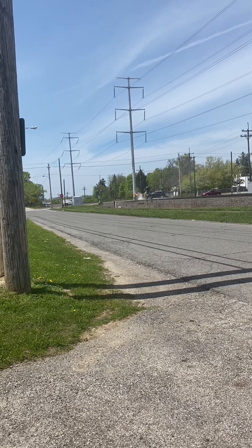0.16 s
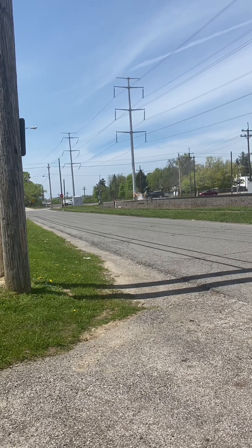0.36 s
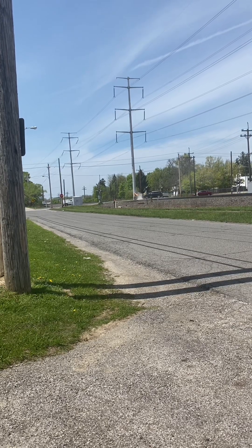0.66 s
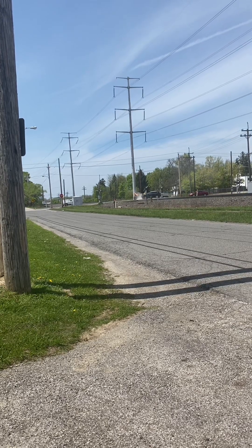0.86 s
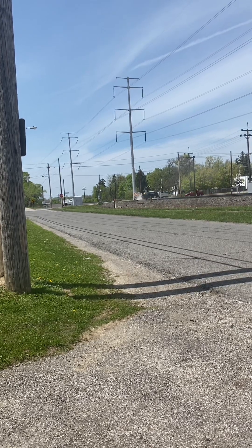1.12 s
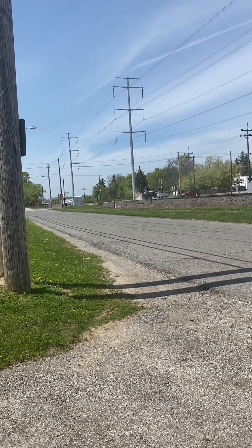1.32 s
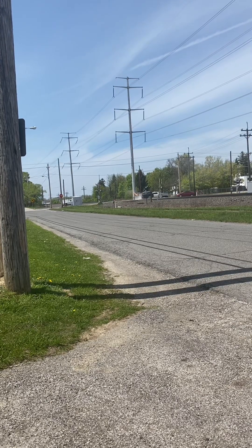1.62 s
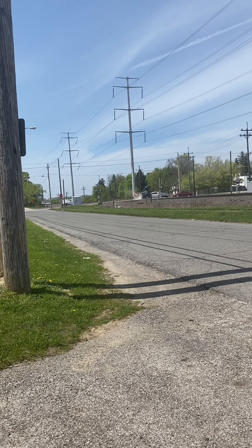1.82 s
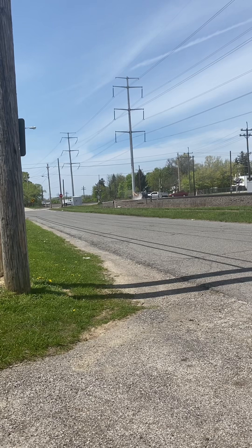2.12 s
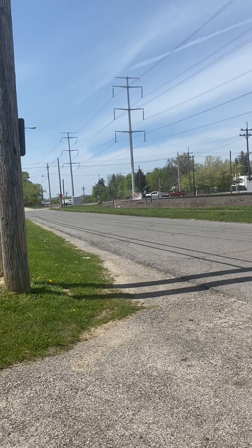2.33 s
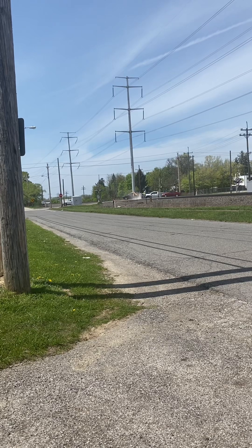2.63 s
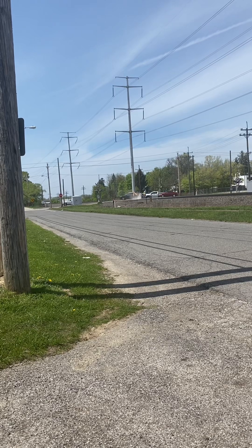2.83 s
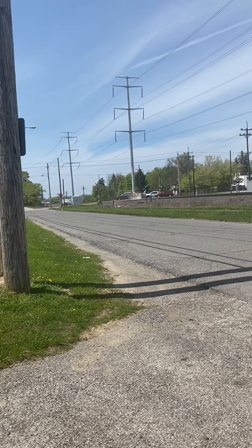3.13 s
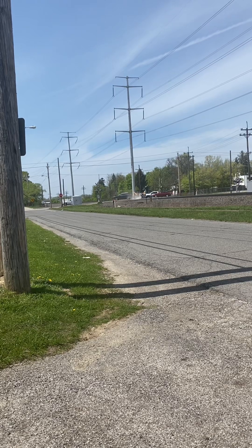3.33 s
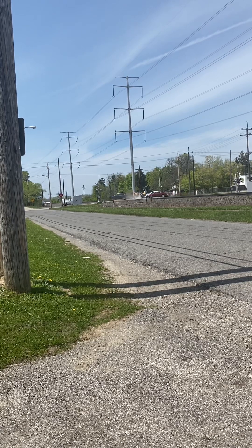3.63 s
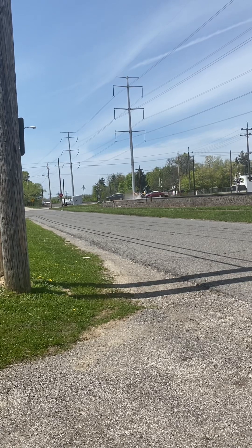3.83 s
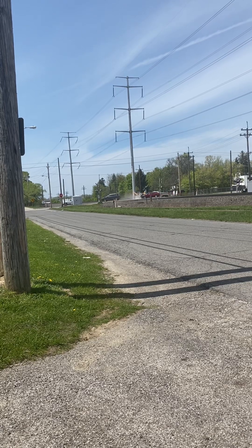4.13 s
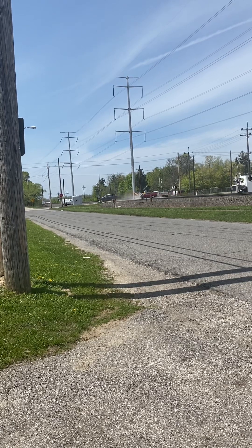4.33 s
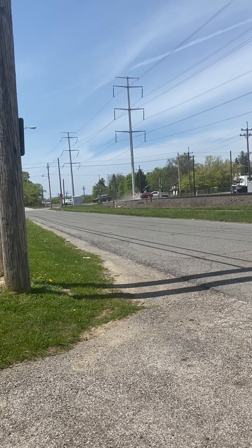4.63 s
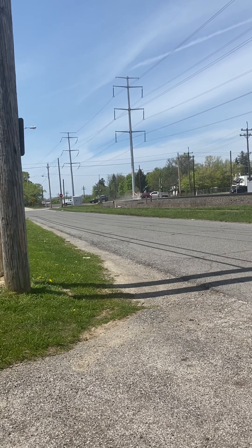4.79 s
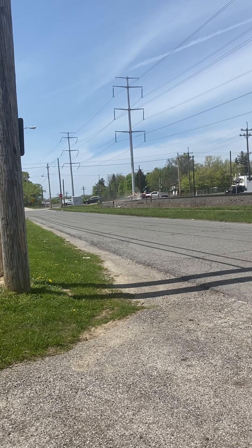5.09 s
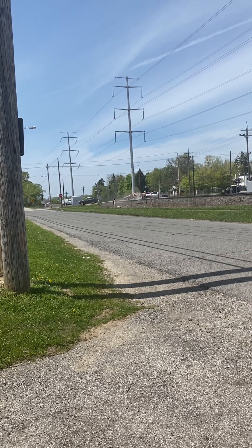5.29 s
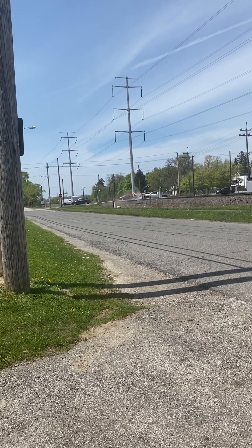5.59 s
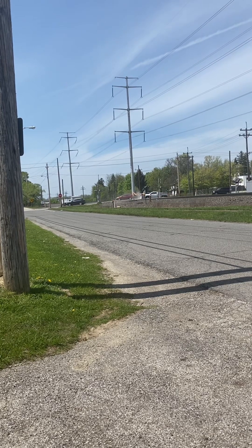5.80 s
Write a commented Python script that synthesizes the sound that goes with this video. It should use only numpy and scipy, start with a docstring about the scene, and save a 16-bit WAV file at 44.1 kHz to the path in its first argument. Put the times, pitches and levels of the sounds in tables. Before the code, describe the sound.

Gusty wind thumps the microphone while a rail maintenance machine clatters through stones and drones, stops for a second and starts again.

```python
"""Ballast machine at a rail crossing

Tools churn the track stones and shake a steel frame, stop for a second, then bite again.
The frame rings and drones, an engine growls and idles on, and wind buffets a phone's two
microphone openings (ports). Sounds are built as the sum and the difference of the two ports."""
import sys
import numpy as np
from scipy import signal
from scipy.fft import rfft, irfft, next_fast_len
from scipy.io import wavfile
from scipy.ndimage import uniform_filter1d

SR = 44100
rng = np.random.default_rng(int(sys.argv[2]) if len(sys.argv) > 2 else 0)


def master(y):
    """Save y as 16-bit WAV."""
    cut = np.clip(np.atleast_2d(y).T, -1, 1)
    pcm = np.round(cut * 32767)  # scale
    wavfile.write(sys.argv[1], SR, pcm.astype(np.int16))


N = 262395
FFT_SIZE = next_fast_len(N)
HZ = np.maximum(np.arange(FFT_SIZE // 2 + 1) * SR / FFT_SIZE, 1)
SECONDS = np.arange(N) / SR

# Tone colour of the distant engine and road. Each row: frequency in Hz, relative level in dB.
DISTANT_COLOUR = [(200, -19), (300, -16), (440, -5.5), (510, 5), (600, 0), (1000, -1), (2400, -6.5),
                  (2900, -12.5), (4500, -22.5), (6000, -14.5), (6400, -53), (9000, -63)]
# Two idling tones. Each row: time in seconds, lower pitch in Hz, lower level in dB, upper level in dB.
IDLE_TONES = [(3.5, 245, -41.5, -75), (3.75, 228, -37.5, -67), (4.0, 204.4, -42, -65),
              (4.2, 190.4, -40, -70), (4.33, 184.2, -40, -55), (4.45, 180.8, -39, -64),
              (4.6, 179.7, -42.5, -60.5), (4.78, 181.6, -43.5, -53), (4.95, 178.2, -44, -54.5),
              (5.1, 175.2, -63, -78)]
# Steady wind. Each row: time in seconds, then three levels in dB: the deep and the upper part
# that press both ports alike, and the part that presses them in opposite ways.
STEADY_WIND = [(0, -33.5, -37.5, -40.5), (.4, -32.5, -32.5, -42), (.8, -30.5, -34.5, -34.5),
               (1.2, -29.5, -36.5, -28), (1.6, -41.5, -39.5, -33), (1.9, -42, -42, -35),
               (2.2, -40.5, -46.5, -35.5), (2.5, -39, -42.5, -34), (2.75, -50, -39.5, -38),
               (3.1, -38, -37, -32.5), (3.4, -38, -33, -36.5), (3.9, -43.5, -29, -35.5),
               (4.2, -41.5, -40.5, -35.5), (4.4, -37.5, -49, -35), (4.9, -31.5, -45.5, -39),
               (5.3, -37.5, -36.5, -34.5), (5.6, -30.5, -36.5, -38.5), (5.95, -36, -29, -30)]
# The opposite wind. Each row: time in seconds, dB of its upper part relative to its deep part.
OPPOSITE_WIND_TILT = [(0, -3.5), (1, -13), (2.4, -3), (3.3, -12), (4.3, -16), (5.1, -12.5), (5.95, -12)]
# Gusts. Each row: middle in seconds, level change in dB, half length in seconds.
WIND_GUSTS = [(0.548, 3.5, 0.035), (.93, 8, .03), (.99, 9, 0.04), (1.06, 7, 0.038), (1.3, 12, 0.018),
              (1.42, 1, 0.024), (1.54, 11, 0.017), (1.65, 11, 0.043), (1.8, 8.5, 0.024), (2.0, 7, 0.037),
              (2.16, 6, 0.023), (2.36, 7.5, 0.035), (2.63, 0.5, 0.027), (3.24, 3.5, 0.048),
              (3.46, -3, 0.027), (4.33, 7, 0.034), (4.47, 5, 0.022), (4.6, 3.5, 0.017), (4.79, 1, 0.029),
              (5.2, 8.5, 0.052), (5.58, 5, 0.053)]
# Single thumps of wind. Each row: middle in seconds, strength in dB, pitch in Hz.
WIND_KNOCKS = [(0.163, -23, 150), (.531, -15, 150), (0.944, -20, 120), (.959, -13, 130), (1.013, -15, 169),
               (1.021, -14.5, 170), (1.052, -15, 169), (1.068, -14, 170), (1.092, -17, 100),
               (1.13, -11, 124.6), (1.303, -15, 129), (1.351, -15.5, 130), (1.524, -22, 218),
               (1.533, -16.5, 238), (1.543, -18.5, 109), (1.633, -15, 250), (1.685, -18.5, 260),
               (2.277, -18, 219), (2.304, -15, 260), (2.337, -21, 260), (2.353, -11, 219),
               (2.3609, -13.5, 510), (2.365, -16, 300), (3.459, -12, 159.7), (4.33, -34, 300),
               (4.475, -33, 310), (4.648, -33, 300), (5.19, -18.5, 110.7)]
# Brief drops of the bass. Each row: start in seconds, length in seconds, depth in dB.
BASS_DIPS = [(0.418, 0.12, -3), (1.094, 0.084, -4), (2.38, 0.11, -6.5), (2.486, 0.042, -10),
             (3.974, 0.031, -3.5), (4.441, 0.022, -16), (4.983, 0.05, -5.5), (5.41, 0.086, -1)]
# The engine's growl. Each row: time in seconds, pitch in Hz, level in dB.
ENGINE_NOTE = [(0, 135, -37.5), (.12, 134, -30), (.6, 131, -35), (1.0, 128, -28.5), (1.3, 129, -39.5),
               (1.9, 134, -45), (2.15, 136, -44), (2.25, 137, -29.5), (2.33, 137, -29), (2.45, 138, -33.5),
               (2.53, 138, -49), (2.75, 139, -46), (2.9, 140, -34), (3.1, 143, -30.5), (3.3, 135, -33),
               (3.6, 138, -34), (4.0, 124, -39.5), (4.6, 128, -48), (5.1, 131, -44), (5.2, 132, -32),
               (5.6, 121, -33), (5.85, 131, -29), (5.95, 135, -31.5)]
# The drone follows how hard the frame is shaken.
# Each row: middle in seconds, level change in dB, half length in seconds.
DRONE_SWELLS = [(.17, 9, 0.027), (.62, 5, 0.053), (.76, 3.5, 0.036), (.86, 5, 0.025), (1.05, 4, 0.026),
                (1.43, 5.5, 0.029), (1.8, 0.5, 0.023), (2.03, 6.5, 0.051), (2.3, 4, 0.059),
                (2.44, -6, 0.05), (2.55, 6, 0.053), (2.63, 3.5, .03), (2.71, 7, 0.024), (2.92, 1.5, 0.098),
                (3.24, 6.5, 0.091), (3.45, 5, 0.13), (3.66, 8, 0.028), (5.17, 5, 0.025), (5.29, 8, 0.05),
                (5.52, 5.5, 0.047), (5.76, 7.5, 0.083)]
# Grit close by. Each row: start in seconds, strength in dB.
GRIT_TICKS = [(2.633, -50), (4.4676, -62), (4.7194, -60)]
# Hard hits on the frame. Each row: middle in seconds, level in dB, pitch in Hz, half length in seconds.
FRAME_PINGS = [(.32, -48, 3100, 0.013), (.378, -35.5, 1270, 0.012), (.382, -36, 2340, .008),
               (2.634, -39, 4400, 0.003), (2.825, -32, 1280, 0.013), (2.896, -29, 2376, 0.0075),
               (2.97, -34.5, 2290, 0.014), (3.12, -30, 1230, 0.014), (3.16, -34, 2335, 0.01),
               (3.45, -33.5, 1060, 0.027), (3.871, -36.5, 626, 0.031), (5.29, -29, 2353, 0.017),
               (5.33, -50, 4400, 0.014), (5.432, -27, 1050, 0.011), (5.515, -43, 3160, 0.014),
               (5.61, -46.5, 4450, 0.014), (5.68, -45, 3150, 0.016), (5.441, -33.5, 2290, 0.024),
               (5.77, -33, 964, 0.017)]
# Stones hitting steel. Each row: start in seconds, strength in dB.
STONE_CLANKS = [(0.38, -47), (0.5178, -46), (0.6434, -52), (1.037, -45.5), (1.201, -44.5), (1.3874, -44.5),
                (2.378, -35), (2.63, -48), (2.813, -44.5), (2.9775, -47), (3.058, -37.5), (3.1388, -39),
                (3.2952, -41), (3.388, -32.5), (3.477, -41), (5.4833, -44), (5.5418, -70), (5.5878, -54),
                (5.668, -42)]
# How hard the tools work. Each row: time in seconds, then levels in dB of the clatter,
# the steel's ring, the mids and the low mids.
TOOL_EFFORT = [(0, -39, -50, -39, -41.5), (.21, -39, -51, -39, -40), (.3, -45, -54, -45, -41.5),
               (.38, -36.5, -48, -38, -39), (.48, -38.5, -52, -38.5, -39), (.62, -39, -51.5, -43.5, -41.5),
               (.75, -41, -51, -42.5, -38.5), (.9, -42.5, -52, -44, -42), (1.15, -45, -53, -42.5, -43.5),
               (1.36, -44, -52.5, -42, -41.5), (1.6, -43, -53.5, -42.5, -42),
               (1.9, -44, -54.5, -46.5, -41.5), (2.17, -45.5, -54, -45, -42), (2.36, -46, -54.5, -42, -37),
               (2.55, -44, -54, -42.5, -40), (2.75, -39, -51, -40, -37.5), (3.0, -37, -50.5, -39, -38.5),
               (3.2, -35.5, -49, -38.5, -37), (3.35, -36, -52.5, -37, -38.5), (3.47, -35.5, -49, -36, -38),
               (3.6, -34.5, -49.5, -39, -37), (3.79, -44.5, -55, -48.5, -44.5),
               (3.89, -40.5, -54, -43, -39.5), (3.97, -46.5, -58, -47.5, -45),
               (4.12, -61.5, -64, -59.5, -52), (5.04, -56.5, -65, -58, -60.5),
               (5.13, -44.5, -55, -46, -47.5), (5.24, -36, -46, -40, -38.5), (5.45, -36, -48, -42.5, -38.5),
               (5.63, -41.5, -48.5, -44, -38.5), (5.78, -37, -47.5, -37.5, -38),
               (5.95, -37.5, -48, -41.5, -36.5)]
# Slices of the churning sound, each with its own level. Each row: low edge in Hz, high edge in Hz.
CHURN_BANDS = [(300, 560), (560, 850), (850, 1500), (1500, 2750), (2750, 5000), (5000, 7400), (7400, 16000)]
# The notes the steel frame rings at. Each row: pitch in Hz, width in Hz, dB over the broad clatter.
FRAME_NOTES = [(417, 15, 3.5), (452.2, 32.6, 10.5), (640.2, 22.7, 13.5), (954.4, 41, 10.5), (1075, 60, 7.5),
               (1288.5, 36, 7), (1710, 17, 6), (1858, 44, 7.5), (2095, 32, 10), (2284, 70, 7.5),
               (2404, 63, 6.5), (2645, 34, 4.5), (3140, 90, 7.5), (3300, 120, 4), (3490, 45, 5.5),
               (3616, 40, 6.5), (3890, 51, 4.5), (4007, 38, 4.5), (4277, 55, 5.5), (4460, 50, 5.5),
               (4730, 63, 6.5), (5800, 28, 5)]
# The machine's tone colour in the ports' sum and in their difference.
# Each row: frequency in Hz, relative level in dB.
SUM_COLOUR = [(330, -26.5), (400, -0.5), (545, -3), (800, -2.5), (1600, -1.5), (2450, -1.5), (2720, -9.5),
              (2960, -18), (3080, -17), (4300, -15.5), (6000, -27), (6700, -35.5), (7400, -62.5),
              (8600, -40), (11500, -46), (12500, -63.5)]
DIFFERENCE_COLOUR = [(330, -44), (800, -37.5), (1400, -54.5), (2200, -11), (3200, -19), (4800, -20.5),
                     (5400, -32.5), (6000, -28.5), (7500, -29.5), (9300, -55.5), (10500, -65.5),
                     (12200, -57.5), (14000, -60.5)]
# How far the difference is out of step with the sum. Each row: frequency in Hz, angle in radians.
DIFFERENCE_PHASE = [(1500, .5), (2500, .6), (3800, 2.73), (6000, 1.22), (12000, 1.6)]


def undb(db):
    """Turn decibels into a number to multiply by."""
    return 10 ** (np.asarray(db) / 20)


def unit(x):
    """Scale a signal to an average power of 1."""
    return x / np.sqrt(np.mean(x ** 2))


def curves(table):
    """Join a time table's rows with straight lines, one curve for each value column."""
    times, *columns = np.transpose(table)
    return [np.interp(SECONDS, times, column) for column in columns]


def along(table):
    """Spread a frequency table over all frequencies."""
    hz, value = np.transpose(table)
    return np.interp(np.log(HZ), np.log(hz), value)


def bumps(table):
    """Add up smooth swells, in dB."""
    return sum(db * np.exp(-((SECONDS - middle) / half) ** 2) for middle, db, half in table)


def around(moment):
    """The samples within a tenth of a second of a moment."""
    return slice(max(int(moment * SR) - SR // 10, 0), int(moment * SR) + SR // 10)


def shape(x, gain):
    """Filter a signal with one gain for each frequency."""
    return irfft(rfft(x, FFT_SIZE) * gain, FFT_SIZE)[:N]


def band(low_hz, high_hz, order=3):
    """Gains that keep a range of frequencies; a higher order has steeper edges."""
    return 1 / np.sqrt((1 + (low_hz / HZ) ** (2 * order)) * (1 + (HZ / high_hz) ** (2 * order)))


def ring(hz, width_hz):
    """Gains of one ringing note, 1 at its centre."""
    return 1 / (1 + 1j * (HZ ** 2 - hz ** 2) / (HZ * width_hz))


def wander(per_second):
    """A smooth random curve that usually strays by about 1."""
    hold = int(SR / per_second)
    steps = np.repeat(rng.standard_normal(N // hold + 1), hold)
    smooth = uniform_filter1d(uniform_filter1d(steps, hold), hold)[:N]
    return smooth / np.std(smooth)


def noise():
    """White noise, an even hiss."""
    return rng.standard_normal(N)


def distant_idle(level_db=-51, upper_hz=404):
    """Far engine and road noise with two unsteady idling tones; returns sum and difference."""
    colour = undb(along(DISTANT_COLOUR))
    rush = undb(level_db + .5 * wander(4.2)) * unit(shape(noise(), colour))
    difference = undb(level_db - 23.5) * unit(shape(noise(), colour * band(1800, 9000)))
    lower_hz, lower_db, upper_db = curves(IDLE_TONES)
    lower = np.sin(2 * np.pi * np.cumsum(lower_hz + 4 * wander(30)) / SR)
    lower *= undb(lower_db + 3.5 * wander(20))
    upper = np.sin(2 * np.pi * np.cumsum(upper_hz + 3 * wander(22)) / SR)
    upper *= undb(upper_db + 2.2 * wander(12))
    return rush + np.sqrt(2) * (lower + upper), difference


def swirling_air(deep_db, upper_db, deep_hz, upper_hz, flap_db, flap_rate, upper_order):
    """Swirling air makes a deep and an upper rumble that puff separately and flap together."""
    deep = unit(shape(noise(), band(*deep_hz, order=4)) * undb(1.66 * wander(10)))
    upper = unit(shape(noise(), band(*upper_hz, order=upper_order)) * undb(1.85 * wander(10)))
    flap = unit(undb(flap_db * wander(flap_rate)))
    return flap * (undb(deep_db) * deep + undb(upper_db) * upper)


def wind():
    """Gusty wind presses the ports alike (the sum) and in opposite ways (the difference)."""
    deep_db, upper_db, opposite_db = curves(STEADY_WIND)
    tilt_db, = curves(OPPOSITE_WIND_TILT)
    gust_db = bumps(WIND_GUSTS)
    opposite_db += .28 * gust_db
    alike = swirling_air(deep_db + gust_db, upper_db + .93 * gust_db, deep_hz=(45, 96.6),
                         upper_hz=(127.5, 270), flap_db=.72, flap_rate=30, upper_order=6)
    opposite = swirling_air(opposite_db, opposite_db + tilt_db, deep_hz=(55, 260),
                            upper_hz=(300, 540), flap_db=2.96, flap_rate=35, upper_order=3)
    return alike, opposite


def wind_knocks():
    """Each thump of wind is a swing and a half of air pressure with a flattened peak."""
    out = np.zeros(N)
    for middle, db, hz in WIND_KNOCKS:
        near = around(middle)
        cycles = (SECONDS[near] - middle) * hz
        swing = np.cos(2 * np.pi * cycles) * np.exp(-(cycles / .5) ** 2)
        out[near] -= undb(db) * np.tanh(1.1 * swing)
    return out


def dip_bass(x):
    """Now and then the low end drops suddenly and creeps back."""
    depth_db = np.zeros(N)
    for start, length, db in BASS_DIPS:
        age = np.maximum(SECONDS - start, 0)
        depth_db += db * (SECONDS >= start) * np.exp(-(age / length) ** 4)
    gain = uniform_filter1d(undb(depth_db), size=SR // 200)
    return x + shape(x, band(1, 1150)) * (gain - 1)


def rough_tone(hz, throb_db, throb_rate, roughness, rough_rate):
    """A tone driven unevenly: it throbs in level and jitters in level and timing."""
    tone = np.exp(2j * np.pi * np.cumsum(hz) / SR)
    throb = unit(undb(throb_db * wander(throb_rate)))
    jitter = 1 + roughness * (wander(rough_rate) + 1j * wander(rough_rate))
    return unit((tone * throb * jitter).real)


def engine_growl():
    """The engine runs unevenly, so its low note wavers and sounds rough."""
    hz, level_db = curves(ENGINE_NOTE)
    note = rough_tone(hz + 7 * wander(16), throb_db=1.2, throb_rate=16, roughness=.75, rough_rate=60)
    return undb(level_db) * note


def tool_pause_db(lift_s=3.68, fade_db_per_s=47.5, floor_db=-27.5, bite_s=5.03, rise_s=.13):
    """The drone fades when the tools lift out and returns quickly when they bite again."""
    fade_db = np.clip(-fade_db_per_s * (SECONDS - lift_s), floor_db, 0)
    return fade_db * np.clip(1 - (SECONDS - bite_s) / rise_s, 0, 1)


def frame_drone(hz=345.3, base_db=-36.5):
    """The shaken frame hums at its lowest note, with a narrow rumble just below it."""
    level_db = base_db + tool_pause_db() + bumps(DRONE_SWELLS)
    hum = rough_tone(hz + 5 * wander(25), throb_db=1.5, throb_rate=24.88, roughness=.48, rough_rate=70)
    rumble = unit(shape(noise(), ring(321, 38) * band(290, 370)))
    return undb(level_db) * (hum + undb(-4.5) * rumble)


def grit_ticks(decay_s=.003):
    """Grit close by ticks in tiny bursts of bright noise."""
    bursts = sum(undb(db) * (SECONDS >= start) * np.exp(-np.maximum(SECONDS - start, 0) / decay_s)
                 for start, db in GRIT_TICKS)
    return shape(bursts * noise(), band(3500, 9000, order=1))


def frame_pings(roughness=.4):
    """A hard hit rings one note of the frame, roughened by the stone and softened by distance."""
    out = np.zeros(N)
    for middle, db, hz, half in FRAME_PINGS:
        near = around(middle)
        swell = np.exp(-((SECONDS[near] - middle) / half) ** 2)
        out[near] += undb(db) * swell * np.sin(2 * np.pi * hz * SECONDS[near])
    return out * unit(1 + roughness * wander(300))


def stone_hits(uneven_db=2):
    """Countless stone impacts of uneven size blur into a gritty hiss."""
    return unit(noise() * undb(uneven_db * rng.exponential(size=N)))


def clank_level(rise_s=.009, decay_s=.03):
    """Stones clank on steel and the level jumps; distance and echoes soften each start."""
    level = np.zeros(N)
    for start, db in STONE_CLANKS:
        age = np.maximum(SECONDS - start, 0)
        level += undb(db) * (1 - np.exp(-age / rise_s)) * np.exp(-age / decay_s)
    return level


def churn_levels(usual_clatter_db=-40):
    """Each band's level: the tools' effort, a shared surge, its own flicker and the clanks."""
    clatter_db, ring_db, mid_db, low_db = curves(TOOL_EFFORT)
    treble_db = -62 + .76 * (clatter_db - usual_clatter_db)  # the treble follows the clatter
    surge, clanks = wander(10), clank_level()
    levels_db = [low_db, low_db, mid_db, clatter_db, ring_db, treble_db, treble_db]
    flutter_depths = [2, 1.1, .44, .77, 1.36, 2.1, 2]
    clanks_db = [-29, -32, -6.5, -3.5, -13, -13, -9]  # clanks are brighter than the churn
    for level_db, depth, clank_db in zip(levels_db, flutter_depths, clanks_db):
        flutter_db = depth * .6 * (surge + wander(11))
        yield undb(level_db + flutter_db) + undb(clank_db) * clanks


def churning_stones(note_flutter_db=2.3):
    """Churned stones ring the frame, each note coming and going alone; returns sum and difference."""
    direct, scattered = stone_hits(), stone_hits()
    for hz, width_hz, db in FRAME_NOTES:
        shaking = stone_hits() * unit(undb(note_flutter_db * wander(20)))
        direct += undb(db) * shape(shaking, ring(hz, width_hz))
    sum_colour = undb(along(SUM_COLOUR))
    difference_colour = undb(along(DIFFERENCE_COLOUR)) * np.exp(1j * along(DIFFERENCE_PHASE))
    # Each band is divided by the strength of its range, so the tools' effort sets the loudness.
    ranges_hz = [(400, 850), (850, 1500), (1500, 2750), (2750, 5000), (5000, 6500)]
    low, mid, clatter, steel, treble = (
        np.std(shape(direct, sum_colour * (HZ > bottom) * (HZ < top))) for bottom, top in ranges_hz)
    strengths = [low, low, mid, clatter, steel, treble, treble]
    near, wide = 0, 0
    for (bottom, top), level, strength in zip(CHURN_BANDS, churn_levels(), strengths):
        inside = (HZ >= bottom) & (HZ < top)
        near += level / strength * shape(direct, inside)
        wide += level / strength * shape(scattered, inside)
    # Sound scattered by the ground reaches each port differently.
    return shape(near, sum_colour), shape(near + wide, difference_colour)


def scene():
    """Mix the ports' sum and difference, then turn them into left and right."""
    stones, stones_difference = churning_stones()
    idle, idle_difference = distant_idle()
    air, air_difference = wind()
    total = dip_bass(stones + frame_pings() + idle + frame_drone() + engine_growl() + air)
    total += wind_knocks() + grit_ticks()
    difference = stones_difference + idle_difference + air_difference
    return np.array([total + difference, total - difference])


def record(dry, bass_hz=36, top_hz=14300):
    """The phone thins the deepest bass, rounds the peaks and cuts the highest treble."""
    thinned = signal.sosfilt(signal.butter(2, bass_hz, "high", fs=SR, output="sos"), dry)
    rounded = np.tanh(1.47 * thinned) / 1.52
    return signal.sosfilt(signal.ellip(8, .2, 70, top_hz, fs=SR, output="sos"), rounded)


dry = scene()
out = record(dry)
master(out)
```